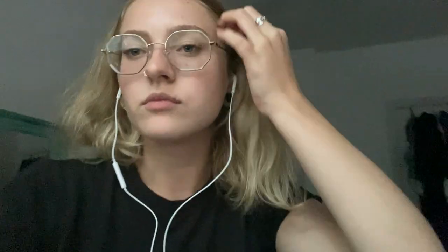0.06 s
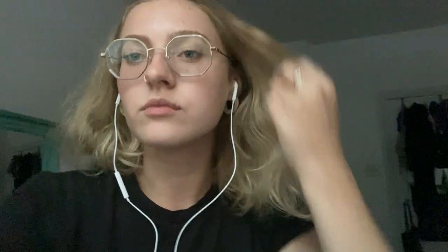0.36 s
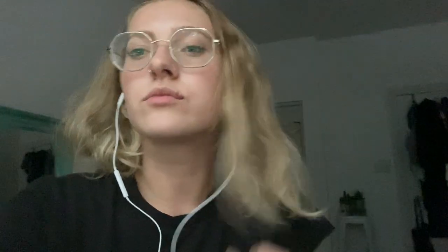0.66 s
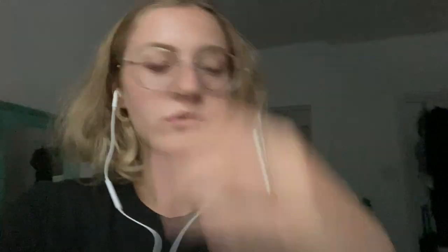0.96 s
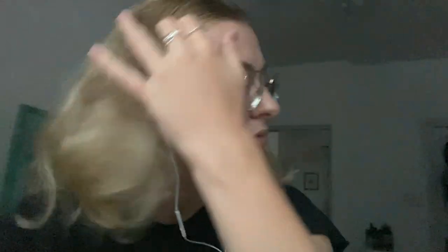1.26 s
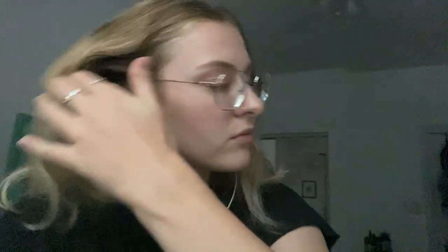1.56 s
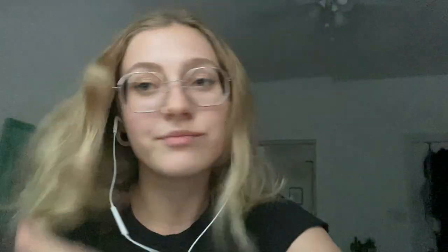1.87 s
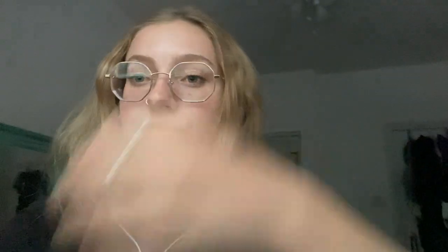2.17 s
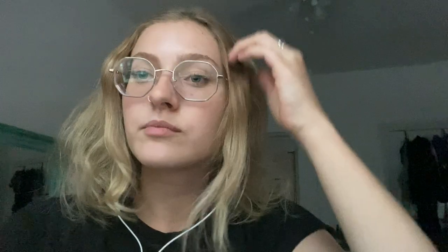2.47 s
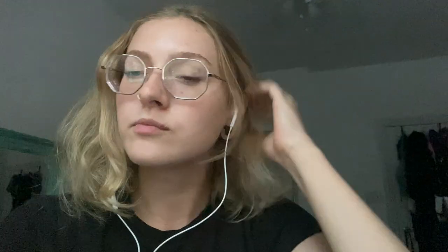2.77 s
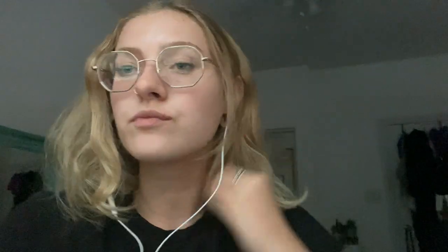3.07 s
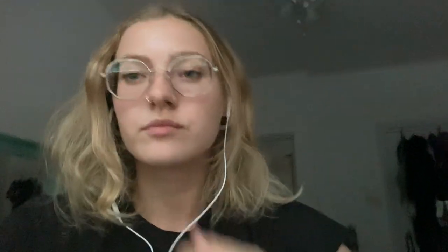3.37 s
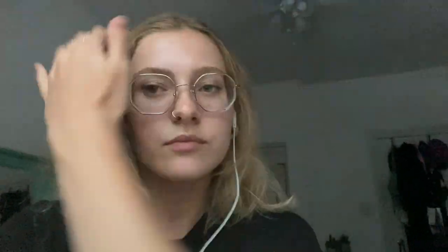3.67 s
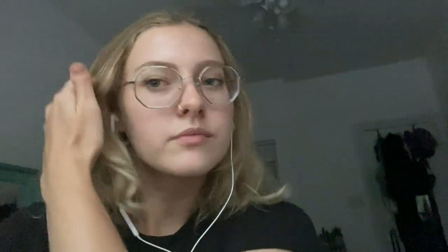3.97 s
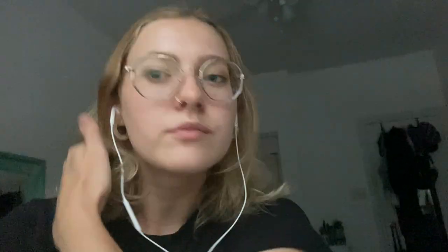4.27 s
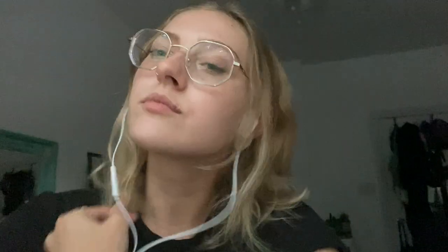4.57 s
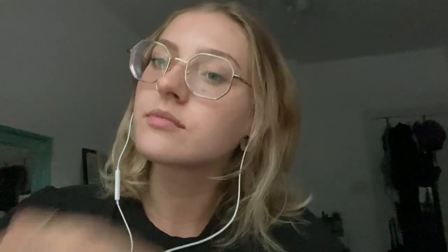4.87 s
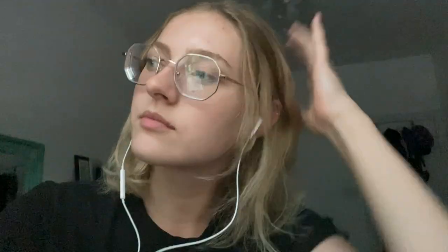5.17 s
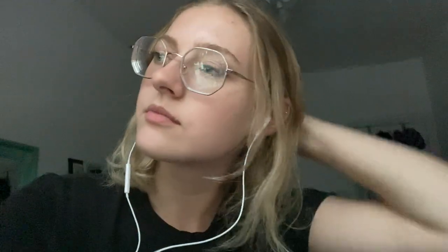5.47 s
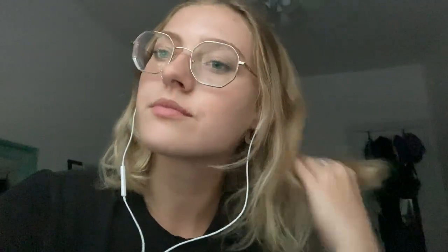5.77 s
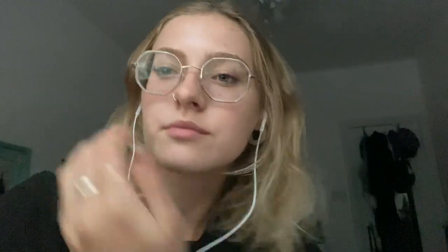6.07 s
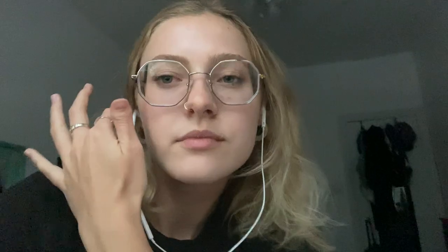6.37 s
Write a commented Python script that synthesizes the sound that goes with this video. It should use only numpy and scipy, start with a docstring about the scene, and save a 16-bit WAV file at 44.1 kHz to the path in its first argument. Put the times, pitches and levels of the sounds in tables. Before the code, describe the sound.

Very close, thin sizzling rustles come and go as hair is swept over an earphone microphone. They start softly, rise in a first cluster, ease off, then peak in a sharp scratch with a click before lighter brushes follow. The cord taps now and then and a sleeve shifts softly. Behind it is a quiet room with a low hum that swells for a while and a few barely audible falling chirps.

```python
"""Combing hair over a microphone

A hand combs through long hair in a quiet room, in strokes that swell and fade. Strands drag over the
small microphone on an earphone cord: countless tiny slips sizzle and ring its housing, some strands snag
and let go, and the cord knocks lightly. A sleeve rustles as the arm moves. Behind it are steady room
noise, a weak drone, a low hum that swells for a while, and a few very faint falling chirps."""
import sys
import numpy as np
from scipy import signal
from scipy.fft import rfft, irfft
from scipy.io import wavfile
from scipy.ndimage import uniform_filter1d, minimum_filter1d

SR = 44100
rng = np.random.default_rng(int(sys.argv[2]) if len(sys.argv) > 2 else 0)


def file_out(sig):
    """Save sig as 16-bit WAV at sys.argv[1]."""
    # one column per channel
    cols = np.atleast_2d(sig).T
    # limit, then scale
    lim = np.clip(cols, -1, 1)
    pcm = np.round(lim * 32767).astype(np.int16)
    wavfile.write(sys.argv[1], SR, pcm)


N = 283254
TIME = np.arange(N) / SR

# tone of the room noise: (frequency [Hz], relative level [dB])
ROOM_SPECTRUM = [(20, -4.5), (40, -2), (55, -3), (75, -7), (110, 2.5), (165, -7), (300, -9), (500, -9.5),
                 (900, -15), (1200, -24), (2200, -28.5), (4000, -31), (8000, -32), (12500, -31.5),
                 (16000, -37)]
# pitches that stand out of the room noise: (frequency [Hz], width [Hz], gain [dB])
ROOM_RESONANCES = [(193.2, 11, -2), (598, 93, -7), (858, 130, -9.5)]
# arm movements that rustle the sleeve: (peak time [s], swell [s], fade [s], level [dB])
ARM_SWEEPS = [(0.3, .9, 1, -62.5), (2.2, 0.41, 0.33, -61.5), (2.95, 0.54, 0.94, -63.5), (4.9, 1, 1, -68.5),
              (6.1, 1, 0.78, -66.5)]
# tone of the sleeve: (frequency [Hz], relative level [dB])
CLOTH_SPECTRUM = [(200, -13.5), (600, -6.5), (1150, -3.5), (1500, -8), (2100, -29.5), (4000, -36.5),
                  (9000, -20)]
# locks of hair sliding over the microphone:
# (peak time [s], swell [s], fade [s], sizzle level [dB], housing ring relative to the sizzle [dB])
HAIR_STROKES = [(0.18, 0.048, 0.037, -54.5, -1.5), (0.275, 0.024, 0.029, -62.5, -2.5),
                (0.45, 0.068, 0.059, -58.5, -1), (0.949, 0.17, 0.22, -58, -27),
                (1.39, 0.1, 0.079, -43.5, -15), (1.862, 0.027, 0.081, -28.5, -16),
                (2.015, 0.062, 0.048, -33.5, -13), (2.1, .03, 0.083, -41.5, -12.5),
                (2.22, 0.041, 0.093, -44, -9), (2.35, 0.052, 0.057, -46, -11.5),
                (2.68, 0.089, 0.074, -54.5, -5.5), (2.88, .09, 0.24, -54, -8),
                (3.1, 0.067, 0.12, -54.5, -3.5), (3.41, 0.06, 0.055, -54.5, -2), (3.58, 0.15, 0.2, -51, -1),
                (3.68, .04, 0.061, -37.5, -9.5), (3.991, 0.13, 0.097, -32.5, -15.5),
                (4.2, 0.27, 0.75, -50.5, -6.5), (4.468, 0.065, 0.037, -19.5, -11.5),
                (4.545, .012, 0.044, -31, -11), (4.673, 0.04, 0.046, -33, -18),
                (4.83, 0.052, 0.18, -42.5, -11.5), (5.03, 0.038, .13, -44.5, -10),
                (5.22, 0.032, 0.026, -43, -18), (5.32, .05, 0.055, -53.5, -9.5),
                (5.54, 0.063, 0.19, -59, -13), (5.8, .04, .06, -56, -17), (5.971, 0.11, 0.15, -56, -7),
                (6.22, 0.054, 0.026, -51, -15.5), (6.34, 0.063, .17, -38, -16)]
# tone of one slipping strand: (frequency [Hz], relative level [dB])
SLIP_SPECTRUM = [(1000, -55), (2200, -36), (3300, -31.5), (4400, -32), (6000, -18), (7200, -18),
                 (8500, -13), (9700, -4), (11000, -4.5), (12700, 3.5), (14300, -3.5), (15700, -3),
                 (17000, -6)]
# weak, high resonances in the sizzle: (frequency [Hz], width [Hz], gain [dB])
SIZZLE_OVERTONES = [(9370, 330, -10), (11060, 1800, -1), (13500, 810, -14)]
# main resonances of the microphone housing: (frequency [Hz], width [Hz], gain [dB])
HOUSING_RESONANCES = [(5146, 320, 5), (5322, 1100, 11.5)]
# rumble of the shaken microphone: (frequency [Hz], relative level [dB])
SHAKE_SPECTRUM = [(25, -25.5), (70, 8.5), (200, -6.0), (420, -6.5), (900, -20.5), (6000, -44.0)]
# knocks of the cord: (time [s], tick level [dB], ring relative to tick [dB], thud relative to tick [dB])
CORD_KNOCKS = [(1.083, -45.5, 14.5, 11), (1.485, -51, 12, 5), (2.262, -38.5, -9, -4),
               (2.376, -39, -20, -11), (2.94, -39, -19, -7), (3.207, -33, -32, -30), (3.267, -42, -3, -20),
               (4.483, -28, 11, 0)]
# tone of the cord scuffing on cloth: (frequency [Hz], width [Hz], gain [dB])
SCUFF_BAND = [(900, 560, 0)]
# faint falling chirps: (start time [s], level [dB])
FAINT_CHIRPS = [(1.10, -71), (1.57, -68), (2.421, -65), (5.20, -64), (5.969, -72)]
# strands that catch and let go: (time [s], strength of the force [dB], length of the run of slips [s])
STRAND_SNAGS = [(1.34, -36, .0005), (1.8306, -30, .002), (1.8864, -5, 0.00056), (1.905, -20, .0005),
                (1.9545, -27, 0.0037), (1.979, -23, 0.0033), (2.022, -16.5, .004), (2.096, -32, .003),
                (2.345, -33, 0.0059), (2.886, -35.5, .0005), (2.955, -26, .0005), (2.9781, -29, .0005),
                (3.767, -33, .0005), (3.839, -38, 0.0033), (4.024, -18, 0.0057), (4.15, -27.5, .004),
                (4.4814, 3, 0.0036), (4.4855, 12, 0.003), (4.5343, -14.5, 0.01), (4.6417, -25, 0.0026),
                (4.6814, -20.5, 0.0038), (4.715, -27.5, .0005), (4.8008, -22, 0.0058),
                (5.0024, -20.5, 0.0039), (5.212, -28.5, 0.0044), (5.637, -36.5, .0005),
                (6.314, -22, 0.0042), (6.3968, -21, 0.0026)]


def undb(db):
    """Turn decibels into a number to multiply by."""
    return 10 ** (np.asarray(db) / 20)


def unit(x):
    """Scale a signal to an average (rms) level of 1."""
    return x / np.sqrt(np.mean(x ** 2))


def add(out, start_s, x):
    """Mix x into out, beginning at start_s."""
    i = int(start_s * SR)
    out[i:i + len(x)] += x[:N - i]


def walk(rate):
    """A random curve of size about 1 that glides to a new value `rate` times a second."""
    step = max(int(SR / rate), 2)
    held = np.repeat(rng.standard_normal(N // step + 1), step)
    return unit(uniform_filter1d(held, step)[:N])


def colour(x, spectrum, size=512):
    """Give x the tone of a spectrum table; white noise keeps its level."""
    hz, db = np.transpose(spectrum)
    bin_hz = np.maximum(np.arange(size // 2 + 1) * SR / size, 1)
    gains = undb(np.interp(np.log(bin_hz), np.log(hz), db))
    # fold the cepstrum so that the filter rings only after each click, never before
    cepstrum = irfft(np.log(gains))
    cepstrum[1:size // 2] *= 2
    cepstrum[size // 2 + 1:] = 0
    response = irfft(np.exp(rfft(cepstrum)))
    return signal.fftconvolve(x, response / np.linalg.norm(response))[:len(x)]


def resonate(x, resonances):
    """Let x ring at each listed pitch, filtering twice to keep the pitches well apart."""
    out = 0
    for hz, width_hz, db in resonances:
        b, a = signal.iirpeak(hz, hz / width_hz, fs=SR)
        once = signal.lfilter(b, a, x + 1e-18)
        out += undb(db) * signal.lfilter(b, a, once + 1e-18)
    return out


def sine(hz):
    """A pure tone that follows a changing pitch."""
    return np.sin(2 * np.pi * np.cumsum(hz) / SR)


def room_noise(level_db=-52.5):
    """A steady, low rush of air in which a few pitches stand out."""
    air = colour(rng.standard_normal(N), ROOM_SPECTRUM, size=8192)
    return unit(air + resonate(air, ROOM_RESONANCES)) * undb(level_db + .5 * walk(rate=2.97))


def hum(hz=46.5, drift_hz=1.1, rest_db=-62, swell_db=-47.5,
        start_s=3.226, rise_s=.45, hold_s=1.77, fall_s=.67):
    """A low hum that drifts in pitch and swells once."""
    swell = np.interp(TIME, np.cumsum([start_s, rise_s, hold_s, fall_s]), [0, 1, 1, 0])
    tone = np.sqrt(2) * sine(hz + drift_hz * walk(rate=4))
    waver = undb(1.3 * walk(rate=7.7))
    return tone * waver * (undb(rest_db) * (1 - swell) + undb(swell_db) * swell)


def drone(hz=101, level_db=-62):
    """A weak tone above the hum that wavers in pitch and level."""
    return sine(hz + 2 * walk(rate=5)) * undb(level_db + 3.1 * walk(rate=3.05))


def movement(peak_s, swell_s, fade_s, edge_db=10, roundness=2.14):
    """A movement speeds up, then slows: it is edge_db weaker swell_s before and fade_s after its peak."""
    away = np.abs(TIME - peak_s) / np.where(TIME < peak_s, swell_s, fade_s)
    return undb(-edge_db * np.minimum(away, 4) ** roundness)


def slips(rate, scatter_db, limit_db):
    """Strands slip at random, about `rate` times a second: many small clicks and a few large ones."""
    happens = rng.random(N) < rate / SR
    size_db = np.minimum(scatter_db * rng.exponential(size=N), limit_db)
    direction = rng.choice([-1, 1], N)
    return unit(happens * direction * undb(size_db) / np.sqrt(rate))


def sleeve():
    """Cloth slides with each sweep of the arm, making a dull, fine rustle."""
    power = sum((undb(db) * movement(peak, swell, fade)) ** 2 for peak, swell, fade, db in ARM_SWEEPS)
    fibres = slips(rate=3000, scatter_db=7.0, limit_db=19.5)
    return colour(fibres, CLOTH_SPECTRUM) * np.sqrt(power)


def hair_contact(rest_db=-67.5, rest_ring_db=-5.5):
    """Add the strokes to the resting hair; give the sizzle level and the ring relative to it, in dB."""
    rub_power, ring_power = undb(rest_db) ** 2, undb(rest_db + rest_ring_db) ** 2
    for peak, swell, fade, db, ring_db in HAIR_STROKES:
        power = (undb(db) * movement(peak, swell, fade)) ** 2
        rub_power += power
        ring_power += power * undb(ring_db) ** 2
    return 10 * np.log10(rub_power), 10 * np.log10(ring_power / rub_power)


def sizzle(force, wander_db=3):
    """Strands slip on plastic; the overtones come and go as the point of contact wanders."""
    hiss = colour(force, SLIP_SPECTRUM)
    return hiss + sum(resonate(hiss, [row]) * undb(wander_db * walk(rate=39)) for row in SIZZLE_OVERTONES)


def brighten(x, tilt_db, pivot_hz=12200):
    """Tip the balance between the sound above and below pivot_hz; the average level stays near 1."""
    upper = signal.sosfiltfilt(signal.butter(3, pivot_hz, "high", fs=SR, output="sos"), x)
    tilt = undb(tilt_db)
    power = 1 + tilt ** 2
    return unit(unit(x - upper) + tilt * unit(upper)) / np.sqrt(power / np.mean(power))


def hair_rub(rub_db, ring_db, dulling=.83, neutral_ring_db=-9, shift_db=2, catch_db=.7, shake_db=-25):
    """Locks catch and slide, so slips come in bunches that sizzle, ring and shake the microphone."""
    # hair pressing on the housing rings it more and sounds duller; shifting contact also tips the tone
    bright_db = dulling * (neutral_ring_db - ring_db) + shift_db * walk(rate=11)
    bunches = unit(undb(catch_db * walk(rate=30) + 1.3 * walk(rate=90) + 1.7 * walk(rate=450)))
    # a firmer rub brings more strands into contact, so the crackle closes up into a hiss
    friction = slips(rate=22000 * undb(.35 * rub_db), scatter_db=2.5, limit_db=8.5) * bunches
    hiss = brighten(sizzle(friction), bright_db)
    ring = unit(resonate(friction, HOUSING_RESONANCES)) * undb(ring_db)
    shake = unit(colour(rng.standard_normal(N), SHAKE_SPECTRUM, size=4096)) * undb(shake_db)
    return (hiss + ring + shake) * undb(rub_db)


def stray_strands(rub_db, follow=.69, offset_db=-23):
    """Single loose strands flick the microphone; they stand out most when the rub is light."""
    flicks = slips(rate=45, scatter_db=4, limit_db=16.5) * undb(follow * rub_db + offset_db)
    return sizzle(flicks) + undb(-9) * resonate(flicks, HOUSING_RESONANCES)


def cord_knocks(tick_hz=1300, shell_hz=3300, thud_hz=190, scuff_db=-15, hard_db=-29,
                tick_fade_s=.00025, ring_fade_s=.00083, thud_fade_s=.0051, scuff_fade_s=.0084):
    """The swinging cord knocks: a dull tick, a short ring of the housing, a thud and a scuff on cloth."""
    out, t = np.zeros(N), TIME[:SR // 10]
    housing_hz = HOUSING_RESONANCES[0][0]
    tick = np.cos(2 * np.pi * tick_hz * t) * np.exp(-t / tick_fade_s)
    ring = np.sin(2 * np.pi * housing_hz * t) * np.exp(-t / ring_fade_s)
    shell = np.sin(2 * np.pi * shell_hz * t) * np.exp(-t / ring_fade_s)
    thud = np.sin(2 * np.pi * thud_hz * t) * np.exp(-t / thud_fade_s)
    for start_s, db, ring_db, thud_db in CORD_KNOCKS:
        scuff = unit(resonate(rng.standard_normal(len(t)), SCUFF_BAND)) * np.exp(-t / scuff_fade_s)
        rings = ring + undb(db - hard_db) ** 2 * shell  # hard knocks wake the shell's lower note
        knock = tick + undb(ring_db) * rings + undb(thud_db) * thud + undb(scuff_db) * scuff
        add(out, start_s, undb(db) * knock)
    return out


def chirps(start_hz=4700, end_hz=3350, length_s=.15, blur_hz=440):
    """Each chirp is a blurred whistle that drops quickly and settles as it swells and fades."""
    out, progress = np.zeros(N), np.linspace(0, 1, int(length_s * SR))
    tone = sine(end_hz + (start_hz - end_hz) * (1 - progress) ** 2)
    swell = np.sqrt(progress * (1 - progress))
    lowpass = signal.butter(2, blur_hz, fs=SR, output="sos")
    for start_s, db in FAINT_CHIRPS:
        blur = signal.sosfilt(lowpass, rng.standard_normal(SR))[:len(tone)]
        add(out, start_s, undb(db) * unit(tone * blur * swell))
    return out


def snags(ring_db=-16, snap=9, thin_hz=9000):
    """A caught strand lets go in one thin snap, or in a short run of slips."""
    force, t = 1e-18 * rng.standard_normal(N), TIME[:SR // 20]
    for start_s, db, length_s in STRAND_SNAGS:
        run = rng.standard_normal(len(t)) * np.exp(-np.minimum(t / length_s, 10) ** 2)
        run[0] = snap * np.exp(-length_s / .0023)  # a shorter release puts more into the first snap
        run *= np.sqrt(SR / 1000) / np.linalg.norm(run)  # as much energy as one millisecond at level 1
        add(force, start_s, undb(db) * run)
    thin = signal.sosfilt(signal.butter(1, thin_hz, "high", fs=SR, output="sos"), force)
    return sizzle(thin) + undb(ring_db) * resonate(force, HOUSING_RESONANCES)


def scene():
    """All the sounds add up at the one microphone."""
    rub_db, ring_db = hair_contact()
    hair = hair_rub(rub_db, ring_db) + stray_strands(rub_db) + snags()
    return (hair + sleeve() + cord_knocks() + chirps() + room_noise() + hum() + drone())[None]


def record(dry, top_hz=15750):
    """Turn the level down briefly around peaks above full scale, then cut the highest treble."""
    safe_gain = 1 / np.maximum(np.abs(dry), 1)
    smooth_gain = uniform_filter1d(minimum_filter1d(safe_gain, size=45), size=45)
    return signal.sosfilt(signal.ellip(10, .2, 70, top_hz, fs=SR, output="sos"), dry * smooth_gain)


dry = scene()
out = record(dry)
file_out(out)
```